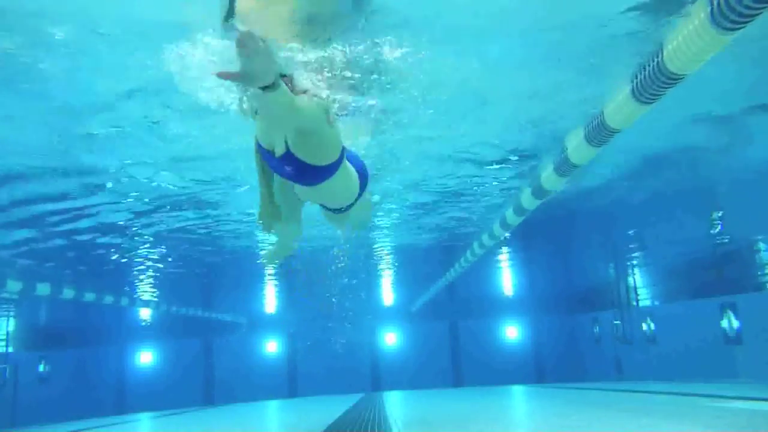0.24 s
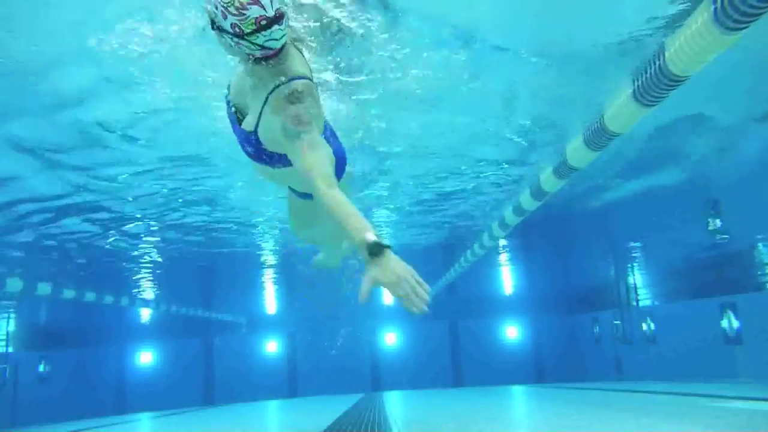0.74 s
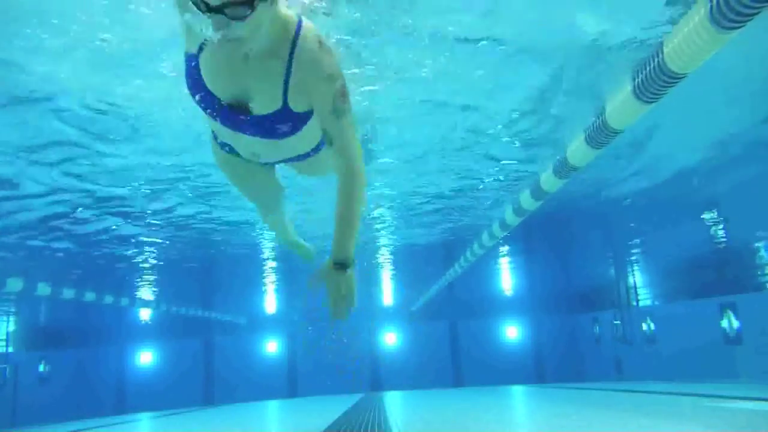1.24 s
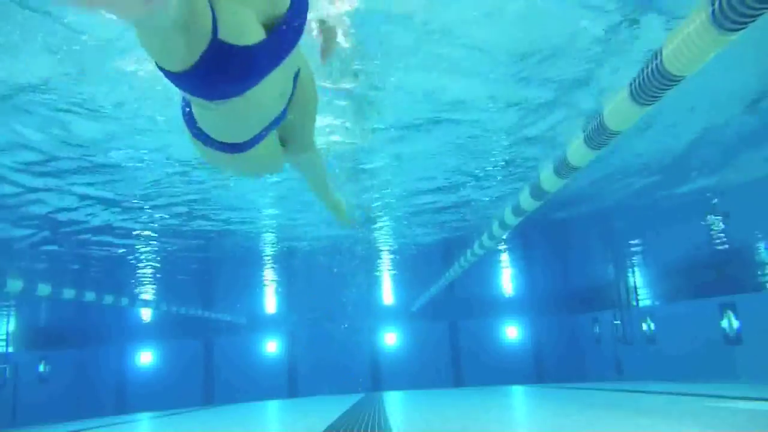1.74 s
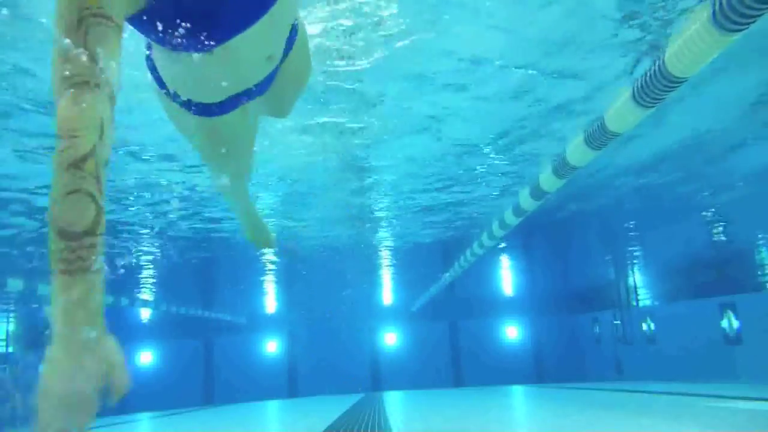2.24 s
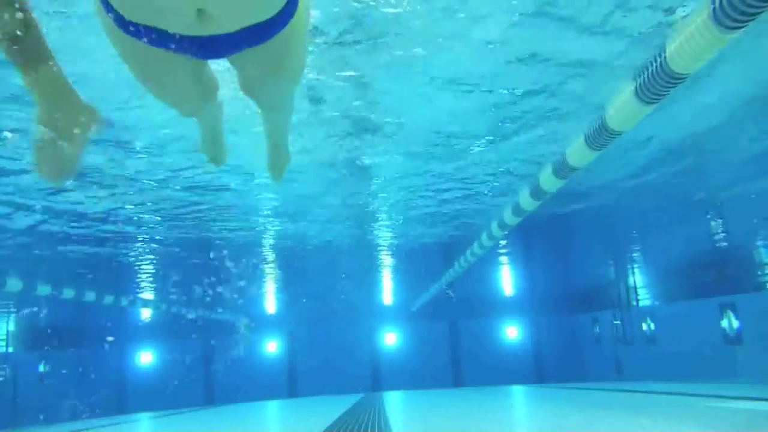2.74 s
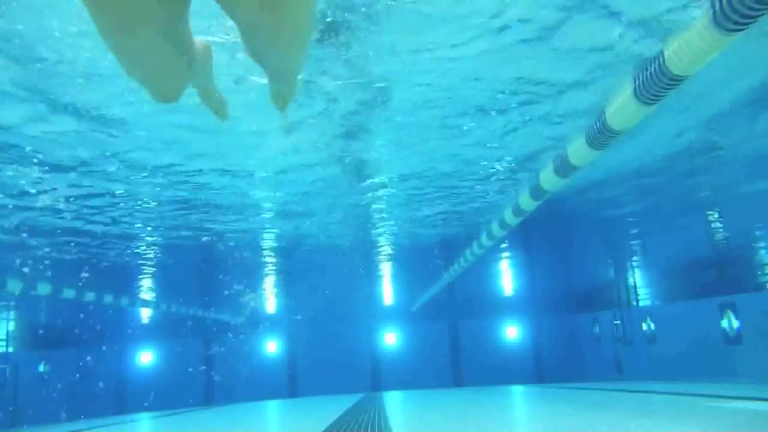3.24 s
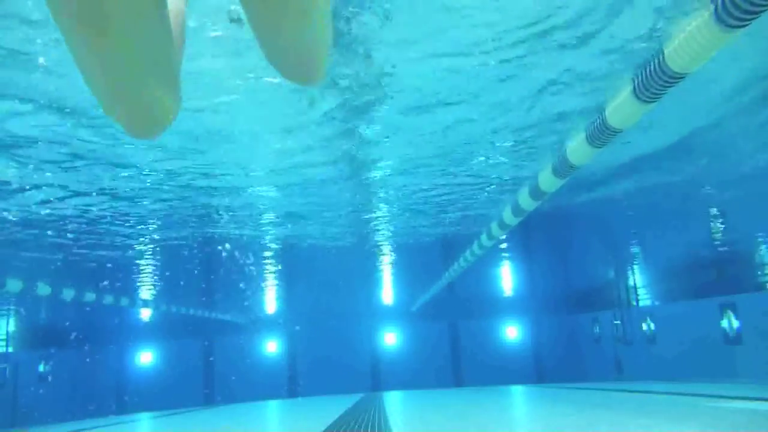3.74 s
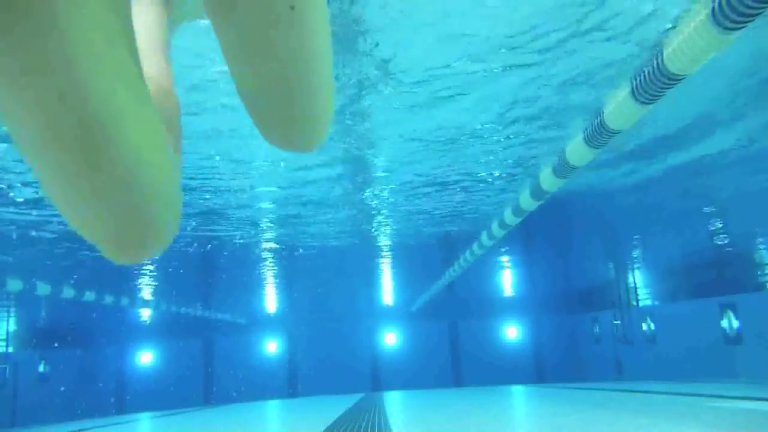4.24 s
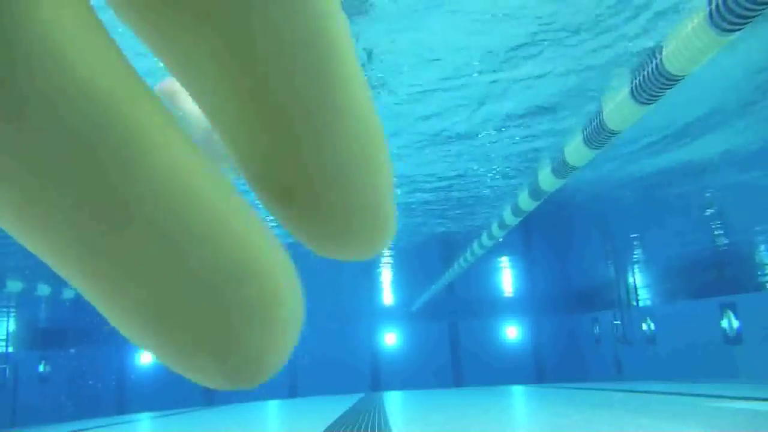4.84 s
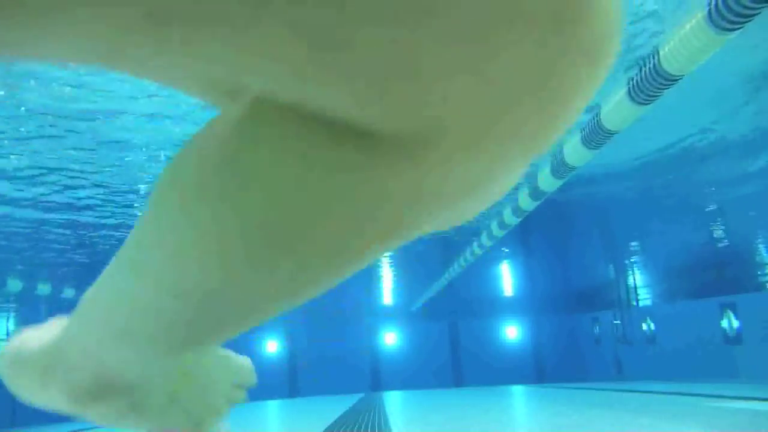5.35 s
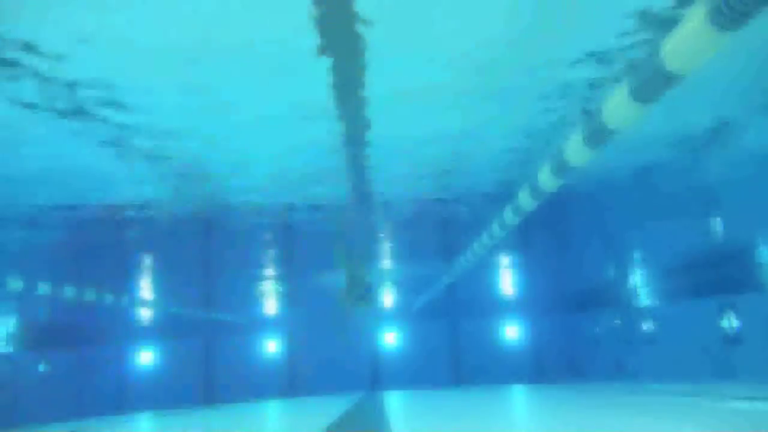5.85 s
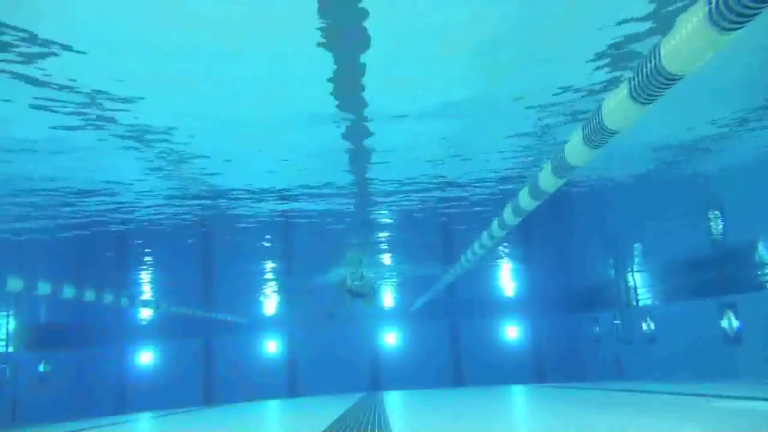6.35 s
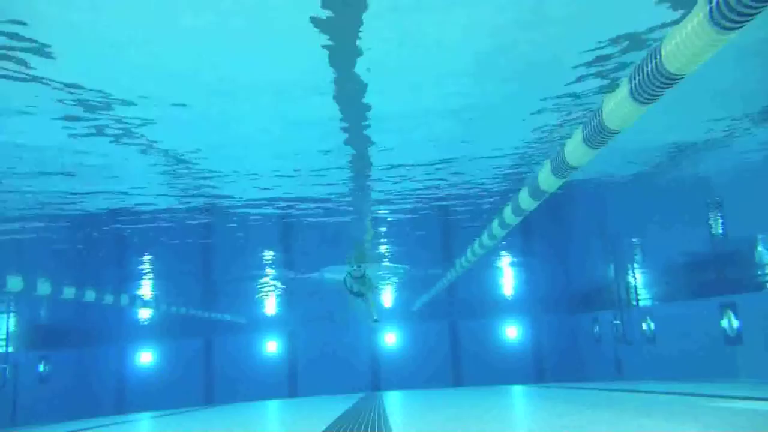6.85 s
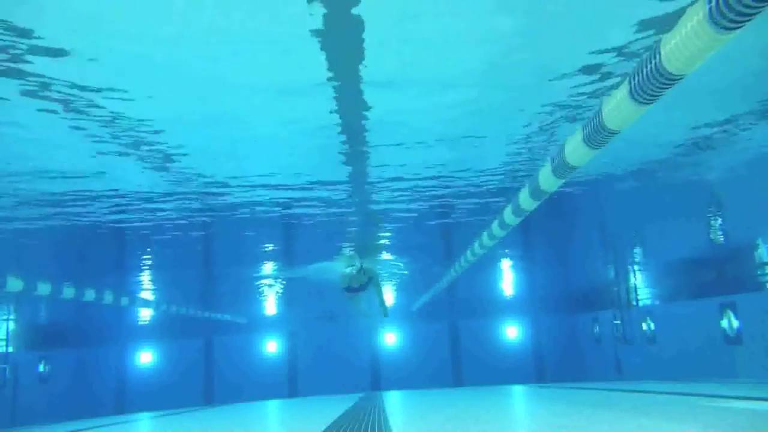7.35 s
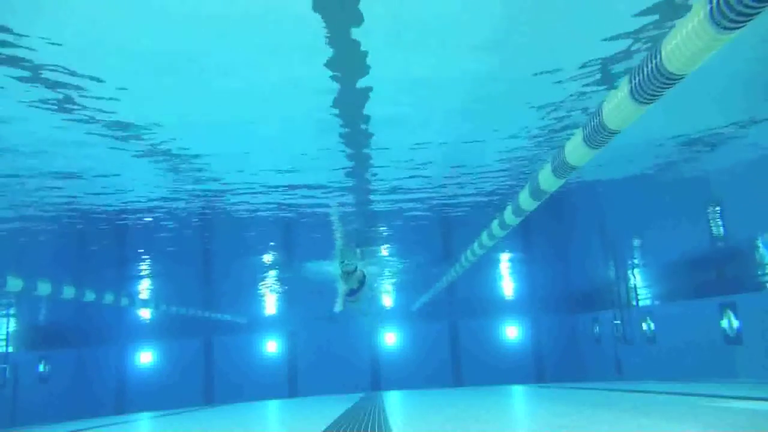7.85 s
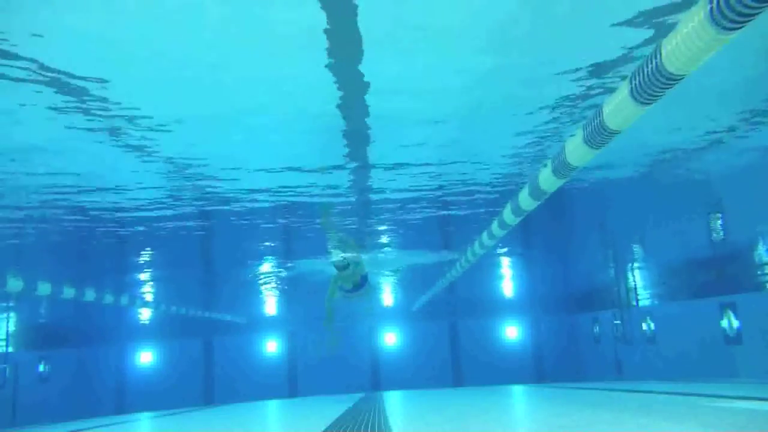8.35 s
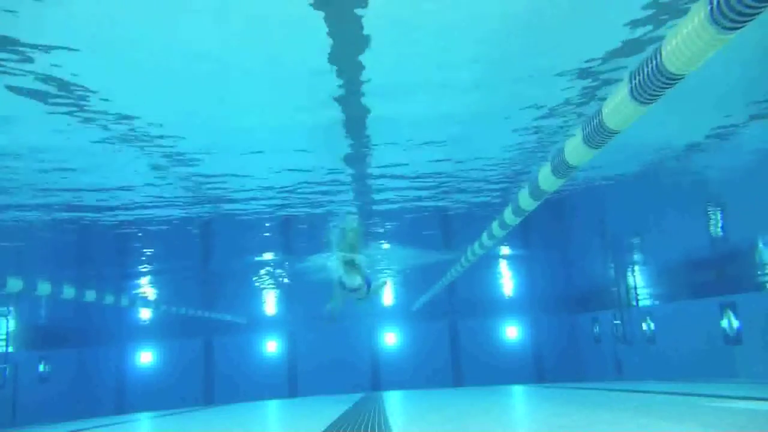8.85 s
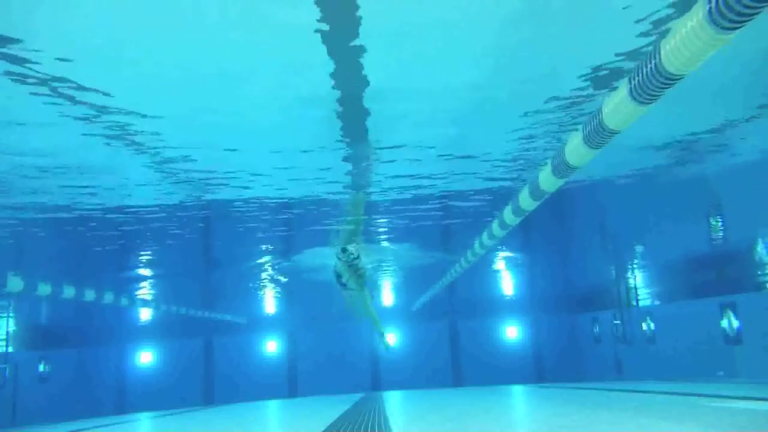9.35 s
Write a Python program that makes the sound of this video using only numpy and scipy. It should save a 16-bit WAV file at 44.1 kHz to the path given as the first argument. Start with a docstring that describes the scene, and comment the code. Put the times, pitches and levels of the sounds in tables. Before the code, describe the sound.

Continuous muffled water noise, close and boxy, flutters between low boom and a nasal ring near one kilohertz. Irregular thuds of pushed water build while a swimmer passes above, strongest from about two and a half to four and a half seconds, distorting the input. Afterwards the ringing burble dominates, with bubble gulps, faint fizz and thin ticks mostly at the right. Underwater stereo pickup inside a pool.

```python
"""Water driven by a swimmer overhead booms in an indoor pool and rings a sealed camera housing on its floor.
The water is flickering noise through resonances; near 1 kHz the housing's two microphones move against each other.
Loud surges and rings are short tones that take the noise's place and overload the input, with a crackle.
Behind them froth, gulps and pings of bubbles and a thin fizz are heard, with a few dry ticks and thin
bright clicks in the right channel, both made of very short noise bursts."""
import sys
import numpy as np
from scipy import signal
from scipy.fft import rfft, irfft, next_fast_len
from scipy.io import wavfile
from scipy.ndimage import uniform_filter1d, minimum_filter1d

SR = 44100
rng = np.random.default_rng(int(sys.argv[2]) if len(sys.argv) > 2 else 0)


def unload_wav(signal):
    """Save mono or channel-first audio to the path in sys.argv[1] as 16-bit WAV at rate SR, clipped to [-1, 1]."""
    wavfile.write(
        sys.argv[1],
        SR,
        np.round(np.clip(np.atleast_2d(signal).T, -1, 1) * 32767).astype(np.int16),
    )


def convert_level_to_amplitude(level_db):
    """Map a level in decibels to its linear amplitude factor."""
    exponent = np.asarray(level_db, float) / 20
    return 10 ** exponent


N = 423801
TIME = np.arange(N) / SR
BINS = next_fast_len(N + 8192)  # transform length, with room for the resonances to die away

# Resonances of the pool basin, the churned water, the froth, the housing and the fizz:
# centre_hz, width_hz, left_db, right_db, right_lead_rad
BASIN_MODES = [(92, 38, -33.5, -25, .2), (156.4, 67.6, 3.5, 0.5, 0.99), (276.8, 86, 0.5, 2, 0.74),
               (341.2, 60.7, 3, 0.5, 0.88)]
CHURN_MODES = [(60, 68, -41.5, -48.5, .2), (126, 89, -12, -11.5, 0.18), (191, 94, -2.5, -9.5, 0.82),
               (254, 11, -10, -9, 3.33)]
FROTH_MODES = [(389.7, 62, 5.5, -9.5, 0.34), (512.5, 66, -1, 3, 2.62), (566, 27, -1, 5.5, 2.7),
               (719.4, 92, -2.5, 6, 3.28)]
HOUSING_MODES = [(902, 370, -23, -11.5, 3.1), (1050, 312, -6.5, 0.5, 3.76), (1170, 100, -2, 1, 3.71),
                 (1296, 297, -2.5, -1, 3.72), (1510, 160, -4.5, -1, 3.47), (1611, 316, -4, -5.5, 3.59),
                 (1840, 554, -21, -29, 4.2), (2050, 370, -34.5, -29.5, 3.95), (2577, 490, -33.5, -31, 3.87),
                 (3154, 1300, -43, -47.5, 3.65)]
FIZZ_MODES = [(4450, 910, -7, 7, 0.0042), (5450, 420, -2, -8.5, 0.01), (6320, 790, -0.5, -0.5, 0.01),
              (8050, 2600, -1.5, -3, 0.0054), (10300, 3800, -2.5, -2.5, 0.0015),
              (13200, 1900, -12.5, -17, 0.0066)]
# Level of the basin boom, before it wavers: time_s, level_db (rms)
BOOM_LEVEL = [(0, -18.5), (.7, -19), (1.05, -17.5), (1.5, -15.5), (1.95, -21.5), (2.5, -13.5), (2.78, -11),
              (3.0, -18.5), (3.25, -10.5), (3.55, -10), (4.0, -23.5), (4.3, -17.5), (5.25, -18),
              (5.75, -26), (6.0, -18.5), (6.5, -20), (7.25, -16.5), (7.5, -20), (9.61, -18)]
# Levels of the stirred water, before they waver: time_s, churn_db (rms), froth_db (rms)
STIR_LEVEL = [(0, -23, -47.5), (.5, -22.5, -40), (1.201, -24, -33), (2.0, -23.5, -39), (2.25, -16, -35),
              (2.55, -24, -34.5), (3.0, -19.5, -39), (3.25, -16.5, -43), (3.548, -27, -31),
              (4.0, -22.5, -48), (4.3, -22.5, -37), (5.3, -21.5, -40), (5.75, -29, -47),
              (6.0, -36.5, -45.5), (6.6, -27.5, -40.5), (7.1, -31.5, -51.5), (7.7, -26, -41.5),
              (8.25, -31, -48.5), (8.75, -24, -45), (9.61, -34, -50)]
# Level of the housing ring, before wavering and the trim of each part: time_s, level_db (rms)
RING_LEVEL = [(0, -22), (.9, -23.5), (2.3, -22.5), (3.25, -25.5), (4.002, -27), (5.249, -23.5),
              (5.75, -25.5), (6.199, -21.5), (7.0, -21), (8.2, -22), (9.61, -21.5)]
# Level of the fizz, before it wavers: time_s, level_db (rms)
FIZZ_LEVEL = [(0, -67.5), (1.0, -68.5), (1.25, -66), (2.0, -66), (2.5, -63), (3.25, -74), (3.75, -74.5),
              (4.1, -70), (4.5, -71.5), (5.3, -69), (6.0, -70.5), (6.3, -72), (6.75, -69), (7.25, -65),
              (7.55, -68.5), (7.899, -68), (9.61, -71)]
# Loud pressure surges from strokes and kicks: peak_s, left_peak_db, pitch_hz, half_width_ms
LOUD_THUMPS = [(1.368, 4.5, 228.3, 2.3), (1.38, -7, 225.4, 4.1), (2.003, -2.5, 189, 3.4),
               (2.288, -3.5, 251, 1.4), (2.596, -2, 142, 5.2), (2.6103, 6.5, 195, 17),
               (2.675, -4, 250, 2.8), (2.743, -1, 224.3, 3), (2.72, -6.5, 301, 4.5), (2.82, -6.5, 280, 3.3),
               (2.898, -4, 203, 7.6), (2.93, -11, 293, 4), (2.754, -10, 128.6, 6.3), (2.783, -1, 191, 2.8),
               (2.854, 0, 253, 1.8), (2.861, -2.5, 304, 4.3), (2.976, 1.5, 186, 3.3),
               (3.098, 7.5, 232, 1.5), (3.121, -4, 254, 3.2), (3.109, -5, 131.7, 5.7),
               (3.175, -5, 140, 8.3), (3.189, 3, 211, 2.6), (3.203, -0.5, 313, 6), (3.212, -1.5, 232, 2.3),
               (3.223, -2.5, 224, 2), (3.249, -5.5, 270, 2.3), (3.317, -2, 192.6, 2.7),
               (3.337, 4, 253.4, 2), (3.405, -1, 325.4, 3.2), (3.421, -2, 276.6, 5.7),
               (3.434, 1.5, 207, 1.1), (3.441, 4.5, 247, 1.6), (3.469, -7, 328, 5.5),
               (3.493, -4.5, 339, 4.5), (3.522, -3, 327, 5), (3.501, 1, 223, 2.5),
               (3.508, -1.5, 201.3, 1.8), (3.533, -4, 282, 2.3), (3.59, 5.5, 308, 3.2),
               (3.617, -8.5, 130.3, 6.9), (3.706, -9.5, 120.5, 5.4), (3.751, 0, 192.3, 1.9),
               (3.796, -1.5, 178, 2.8), (4.323, 2, 331, 2.1), (4.383, -4, 314, 4), (4.415, 4.5, 328, 7),
               (4.438, -7.5, 357, 4.1)]
# Loud swells of the housing ring: peak_s, right_peak_db, pitch_hz, half_width_ms
LOUD_RINGS = [(0.266, -1, 1050, 1.8), (0.274, 2.7, 1042, 1.8), (0.333, 0.5, 1170, 2.1),
              (.369, 0, 1038, 3.1), (0.432, 2, 1208, 0.53), (0.629, -1, 1050, 3.3), (0.641, 2.5, 1036, 3.2),
              (0.82, 0.6, 1198, 1.8), (0.896, -4.5, 1440, 1.8), (1.186, 1.3, 1080, 3.3),
              (1.425, 1, 1180, 1.6), (1.448, -0.5, 1136, 3.4), (1.464, 1, 1123, 2.2),
              (1.713, 0, 1237, 0.79), (1.794, -6, 1544, 0.95), (1.958, 0, 1090, 2.2),
              (2.067, -3.5, 1380, 2.4), (2.134, -1.5, 1134, 2.9), (2.189, -2.5, 1191, 1),
              (2.384, -.5, 1074, 1), (2.399, 1.5, 1140, 1.9), (2.487, 1.5, 1620, 1.15),
              (2.589, 0.5, 1153, 0.63), (2.607, -3, 1130, 0.98), (2.624, -6, 1225, 0.72),
              (2.744, -5, 1368, 0.91), (2.837, 1.5, 1290, 0.44), (2.97, -1.5, 1428, 1.7),
              (3.015, .3, 1150, 1.3), (3.031, 1.5, 1250, 1), (3.401, 0.3, 1135, 0.9),
              (3.493, -2, 1144, 0.9), (3.696, 1, 1093, 2.1), (3.786, 0, 1043, 2.6), (3.855, -4, 1086, 4.7),
              (4.183, -1.5, 1060, 1.2), (4.273, -0.5, 1130, 1.4), (4.317, -1, 1252, 0.48),
              (4.342, 2, 1140, 1.4), (4.442, 0.5, 1060, 3.1), (4.854, -0.5, 1400, 2.8),
              (5.226, 1.4, 1236, 1.2), (5.39, -0.5, 1090, 1.3), (5.412, 1.1, 1173, 1),
              (5.909, 3.5, 1377, 0.42), (6.092, 5.5, 1100, 1.6), (6.102, 1.5, 1195, 0.6),
              (6.171, 3, 1066, 3.9), (6.239, 0.1, 1100, 2.4), (6.324, 5, 1105, 2.7),
              (6.333, 3.1, 1274, 0.99), (6.405, 1.5, 1126, 2.1), (6.509, -0.4, 1120, 3),
              (6.527, 2, 1240, 1.3), (6.744, -1.5, 1250, 1.1), (6.835, 0.2, 1185, 2.1),
              (6.979, 1, 1197, 2.1), (7.076, 1.5, 1286, 0.86), (7.163, 0.9, 1235, 1.1),
              (7.189, 1.5, 1207, 0.83), (7.294, -1, 1170, 1.1), (7.406, 1.3, 1376, 0.85),
              (7.487, 2.5, 1204, 0.79), (7.557, 2, 1182, 1.8), (7.866, 2.5, 1072, 1.2),
              (7.998, 0.4, 1130, 1.1), (8.177, 5.5, 1184, 2.5), (8.539, 0.9, 1145, 1.8),
              (8.544, 2.5, 1186, 1.4), (8.55, 0.1, 1185, 1.1), (8.605, 0, 1320, 1.6),
              (8.644, 0.1, 1177, 0.99), (8.779, 0, 1234, 1.1), (8.915, 1.1, 1227, 1.4),
              (8.998, 1.5, 1202, 0.71), (9.026, 1.5, 1150, 1.2), (9.0303, 2.7, 1070, 2),
              (9.036, 0, 1073, 1.8), (9.098, 1, 1210, 1.5), (9.169, 4.5, 1200, 1.5), (9.261, -1, 1437, 4.4),
              (9.303, 1, 1114, 1.4), (9.313, 0.5, 1183, 1.3), (9.52, 2, 1103, 2), (9.528, -0.5, 1100, 1.1)]
# Loud gulps of large bubbles: peak_s, right_peak_db, pitch_hz, half_width_ms
LOUD_GULPS = [(.042, -16, 567, 6.6), (.075, -16, 566, 3), (.39, -9.5, 892, 7.6), (.612, -19, 792, 4.4),
              (.691, -13, 617, 1.7), (1.054, -13, 747, 5.8), (1.309, -9, 828, 12), (1.526, -11, 510, 4.4),
              (2.258, -1, 710, 1.6), (2.302, -12.5, 860, 4), (2.336, -12, 674, 2.2), (2.629, -17, 563, 1.7),
              (3.002, -7.5, 848, 7.1), (2.61, -12, 479, 8), (3.19, -16, 700, 4), (3.406, -7, 600, 5.4),
              (3.49, -12, 744, 7.5), (3.61, -15, 737, 5), (3.745, -9, 770, 2.1), (3.802, -13, 665, 1.6),
              (4.325, -6, 522, 5.3), (4.544, -11, 750, 5.5), (4.93, -3, 920, 3.7), (5.012, -11.5, 686, 2.2),
              (6.287, -18, 715, 3.1), (7.701, -16, 814, 11), (9.006, -7, 901, 4.5),
              (9.059, -15.5, 800, 9.7)]
# Single small bubbles that ping near the housing: peak_s, right_peak_db, pitch_hz, half_width_ms
BUBBLE_PINGS = [(.432, -35.5, 3240, 2), (4.555, -35, 3170, 5), (4.675, -43.5, 4280, 4),
                (5.826, -24, 3200, 0.88), (6.952, -30.5, 3340, 2), (8.494, -42, 3600, 2)]
# Lesser swells at random moments, peaks relative to the level of their water:
# over_water_db, scatter_db, pitch_hz, scatter_octaves, half_width_ms
SMALL_THUMPS = (10.9, 0.75, 220, 0.25, 3.1)
SMALL_RINGS = (17.5, 1.5, 1130, .17, 3.6)
SMALL_GULPS = (23, 1.5, 800, .08, 5)
# Dry ticks, stronger at the right: start_s, left_db, right_db
DRY_TICKS = [(5.827, -52, -28), (5.909, -43.5, -35)]
# Thin bright clicks in the right channel, many just before an overload:
# start_s, right_db (rms of the first 12 samples)
BRIGHT_CLICKS = [(0.3292, -29.5), (.431, -35), (.818, -41.5), (1.366, -25.5), (1.423, -34.5), (1.4614, -27),
                 (2.3936, -35.5), (2.589, -49), (2.7406, -37), (3.0283, -41.5), (3.583, -40),
                 (3.695, -42.5), (4.41, -28), (6.17, -41), (6.509, -44.5), (6.525, -34.5), (7.5558, -24),
                 (7.865, -34.5), (7.993, -42), (8.7772, -43), (8.910, -36.5), (9.022, -32), (9.1672, -27.5),
                 (9.2997, -39), (9.525, -41.5)]


def curve(rows):
    """Columns of a table, joined by straight lines in time."""
    s, *columns = np.transpose(rows)
    return [np.interp(TIME, s, column) for column in columns]


def walk(rate_hz):
    """Random levels held for 1 / rate_hz and slewed twice; spread near 1."""
    hold = int(SR / rate_hz)
    held = np.repeat(rng.standard_normal(N // hold + 1), hold)
    return 1.3 * uniform_filter1d(uniform_filter1d(held, hold), hold)[:N]


def response(modes, hz):
    """Left and right gain of steep resonances; the right phase follows the nearest ones."""
    centre, width, left_db, right_db, lead = np.transpose(modes)[:, :, None]
    shape = 1 / (1 + ((hz - centre ** 2 / (hz + 1)) / width) ** 2) ** 3
    turn = np.angle(np.sum(shape * convert_level_to_amplitude(right_db) ** 2 * np.exp(1j * lead), axis=0))
    left = np.sqrt(np.sum(shape * convert_level_to_amplitude(left_db) ** 2, axis=0))
    right = np.sqrt(np.sum(shape * convert_level_to_amplitude(right_db) ** 2, axis=0))
    return np.array([left, right * np.exp(1j * turn)])


def wash(modes, level_db, apart, flicker_db, crest_db):
    """Flickering noise in resonances; a share (apart) is unrelated left and right; crests level off over rms."""
    noise = rng.standard_normal((3, N)) * convert_level_to_amplitude(flicker_db * walk(25))
    drive = rfft(np.sqrt(1 - apart) * noise[0] + np.sqrt(apart) * noise[1:], BINS)
    coarse_hz = np.arange(0, SR / 2, 4.)
    bin_hz = np.arange(drive.shape[1]) * SR / BINS
    spectrum = drive * [np.interp(bin_hz, coarse_hz, g) for g in response(modes, coarse_hz)]
    sound = irfft(spectrum, BINS)[:, :N]
    quadrature = irfft(-1j * spectrum, BINS)[:, :N]
    power = (sound ** 2 + quadrature ** 2).sum(axis=0)
    gain = (1 + (power / power.mean() / convert_level_to_amplitude(crest_db) ** 2) ** 2) ** -.25
    sound = sound * uniform_filter1d(uniform_filter1d(gain, size=30), size=30)
    return sound / np.sqrt(np.mean(sound.mean(axis=0) ** 2)) * convert_level_to_amplitude(level_db)


def swells(table, modes, side, rise_share, skirt, beat_db, far_db=0):
    """Short tones under a pointed bell, set at both microphones by the resonances; also their hold on each moment, 0-1.

    The table's levels hold at microphone side (0 left, 1 right)."""
    out, taken = np.zeros((2, N)), np.zeros(N)
    for (s, peak_db, hz, half_ms), draws in zip(table, rng.standard_normal((len(table), 3))):
        sign, glide, detune = draws
        near = slice(max(int(s * SR) - 3000, 0), int(s * SR) + 5000)
        t = TIME[near] - s
        rise_ms = min(half_ms * rise_share, 4.9)  # longer swells only die away more slowly
        width_ms = np.where(t < 0, rise_ms, 2 * half_ms - rise_ms)
        bell = uniform_filter1d(2. ** -(abs(1000 * t / width_ms) ** 1.5), size=24)
        foot = 2. ** -(abs(1000 * t / np.minimum(3.8 * width_ms, 25)) ** 2)  # broad and weak
        bell = (1 - skirt) * bell + skirt * foot
        gains = response(modes, np.array([1. * hz]))
        gains[1 - side] *= convert_level_to_amplitude(far_db)
        # a crest or a trough meets the top of the bell; the pitch slides a few percent over it
        cycles = hz * t * (1 + .05 * glide * np.tanh(250 * t / half_ms))
        tone = np.exp(2j * np.pi * cycles)
        # a weaker neighbouring tone beats with it and makes the crests uneven
        offset = np.sign(detune) * (.15 + 0.11 * abs(detune))
        beat = (1 + convert_level_to_amplitude(beat_db) * np.exp(2j * np.pi * hz * t * offset)) / (1 + convert_level_to_amplitude(beat_db))
        scale = gains / gains[side] * np.sign(sign) * convert_level_to_amplitude(peak_db)
        out[:, near] += np.real(scale * bell * tone * beat)
        taken[near] = np.maximum(taken[near], np.sqrt(abs(bell) / bell.max()))
    return out, taken


def scattered(rule, level_db, count):
    """Rows of swells at random moments, as strong as the water is then."""
    over_db, scatter_db, hz, octaves, half_ms = rule
    when = rng.random(count) * (N - 1)
    size, pitch, width = rng.standard_normal((count, 3)).T
    peak_db = level_db[when.astype(int)] + over_db + scatter_db * size
    return list(zip(when / SR, peak_db, hz * 2 ** (octaves * pitch), half_ms * 1.34 ** width))


def fizz():
    """Thin treble hiss of fine bubbles: noise in broad high resonances, mostly unrelated left and right."""
    level_db, = curve(FIZZ_LEVEL)
    return wash(FIZZ_MODES, level_db + .8 * walk(16), 0.66, 1.8, 12)


def ticks():
    """Dry ticks, stronger at the right: noise bursts that die within about a millisecond."""
    out = np.zeros((2, N))
    for s, left_db, right_db in DRY_TICKS:
        burst = rng.standard_normal(60) * np.exp(-np.arange(60) / 12)
        out[:, int(s * SR):int(s * SR) + 60] = convert_level_to_amplitude(np.array([[left_db], [right_db]])) * burst
    return out


def clicks():
    """Thin bright clicks in the right channel: noise differenced twice, under a steep decay."""
    out = np.zeros((2, N))
    for s, db in BRIGHT_CLICKS:
        burst = np.diff(rng.standard_normal(62), n=2) * np.exp(-np.arange(60) / 8.)
        out[1, int(s * SR):int(s * SR) + 60] += convert_level_to_amplitude(db) * burst / np.sqrt(np.mean(burst[:12] ** 2))
    return out


def bubbles(low_hz, octaves, cycles, db, count):
    """Bubbles of scattered size ring for some cycles and glide up slightly."""
    out = np.zeros((2, N + 4000))
    for when, pitch, size, pan in rng.random((count, 4)):
        hz = low_hz * 2 ** (octaves * pitch)
        turns = np.arange(min(int(5 * cycles * SR / hz), 4000)) * hz / SR
        tone = np.sin(2 * np.pi * turns * (1 + .01 * turns / cycles))
        ring = tone * np.exp(-turns / cycles) * (1 - np.exp(-turns / 2))
        start = int(when * N)
        level = convert_level_to_amplitude(db - 4 * np.log(size + .01))  # few loud, many faint
        out[:, start:start + len(ring)] += level * ring * [[1.2 - pan], [.2 + pan]]
    return out[:, :N]


def blips(froth_db):
    """Larger bubbles swell with the froth; small ones burst throughout."""
    large = convert_level_to_amplitude(froth_db) * bubbles(500, 1.0, 4.2, -1.3, count=400)
    small = bubbles(2200, .75, 12, -54.5, count=2000)
    return large + small


def gulps(froth_db):
    """Large bubbles gulp and single small ones ping: quick-rising tones through froth and housing."""
    rows = LOUD_GULPS + BUBBLE_PINGS + scattered(SMALL_GULPS, froth_db, count=16)
    sound, _ = swells(rows, FROTH_MODES + HOUSING_MODES, side=1, rise_share=0.24, skirt=0.13, beat_db=-20.5)
    return sound


def froth(froth_db):
    """Frothy mid-band noise of the stirred water in its resonances, slowly wavering."""
    return wash(FROTH_MODES, froth_db + 2.3 * walk(2.3), 0.056, 2.0, 12.0)


def churn(churn_db):
    """Low noise of the water churned by the swimmer, wavering a few times a second."""
    return wash(CHURN_MODES, churn_db + 1.5 * walk(4), .01, 1.5, 5.0)


def basin_boom(boom_db):
    """Water noise booming in the low resonances of the basin, nearly alike at both microphones but for phase."""
    return wash(BASIN_MODES, boom_db + .8 * walk(4), .004, 1.5, 7.0)


def housing_ring(ring_db):
    """Water noise rings the housing: its lowest three resonances and the higher ones waver partly together."""
    lumps_db = ring_db + 1.3 * walk(16)
    lower = wash(HOUSING_MODES[:3], lumps_db - 2.5 + 0.81 * walk(14), 0.011, 0.57, 13)
    upper = wash(HOUSING_MODES[3:], lumps_db - 4.5 + 1.2 * walk(14), 0.018, 1.2, 7.8)
    return lower + upper


def thump_swells(rows):
    """Pressure surges: low tones in the basin and churn resonances, rising almost as slowly as they fall."""
    return swells(rows, BASIN_MODES + CHURN_MODES, side=0, rise_share=.9, skirt=0.11, beat_db=-16)


def ring_swells(rows):
    """Swells of the housing ring: they rise faster than they fall, with the left trimmed slightly."""
    return swells(rows, HOUSING_MODES, side=1, rise_share=0.44, skirt=0.13, beat_db=-12.5, far_db=-1.5)


def merge(low, ring, thump_rows, ring_rows, thin):
    """A swell is the resonance running in step, so it takes the noise's place; the other band thins under it."""
    thumps, thumping = thump_swells(thump_rows)
    rings, ringing = ring_swells(ring_rows)
    low = low * (1 - .9 * thumping ** 2) * (1 - thin * ringing)
    ring = ring * (1 - 0.7 * ringing) * (1 - 0.31 * thin * thumping ** 2)
    return low, ring, thumps, rings


def level_off(x, top_db):
    """Gain that lets the crests of the steady water flatten out gently under a ceiling."""
    crest = -minimum_filter1d(-abs(x).max(axis=0), size=90)
    gain = (1 + (crest / convert_level_to_amplitude(top_db)) ** 6) ** (-1 / 6)
    return uniform_filter1d(uniform_filter1d(gain, size=45), size=45)


def scene():
    """Boom, churn, froth, ring and bubbles under a soft ceiling, then loud swells, fizz, ticks and clicks."""
    (boom_db,), (churn_db, froth_db), (ring_db,) = map(curve, (BOOM_LEVEL, STIR_LEVEL, RING_LEVEL))
    low = basin_boom(boom_db) + churn(churn_db)
    ring = housing_ring(ring_db)
    small_thumps = scattered(SMALL_THUMPS, boom_db, count=30)
    small_rings = scattered(SMALL_RINGS, ring_db, count=120)
    low, ring, thumps, rings = merge(low, ring, small_thumps, small_rings, thin=0.18)
    low = low + thumps
    ring = ring + rings + gulps(froth_db) + froth(froth_db) + blips(froth_db)
    gain = level_off(low + ring, top_db=-2.2)
    water = sum(merge(low * gain, ring * gain, LOUD_THUMPS, LOUD_RINGS, thin=.88))
    return water + fizz() + ticks() + clicks()


def top_cut(x):
    """Nothing passes above the cut-off."""
    return signal.sosfilt(signal.butter(12, 15850, fs=SR, output="sos"), x)


def record(dry):
    """The microphones lose the deep bass; the input clips flat just under full scale, with a bright edge."""
    x = signal.sosfilt(signal.butter(2, 65., "high", fs=SR, output="sos"), dry)
    x = np.clip(x, -.985, .985)
    edge_band = signal.butter(1, [15300., 16300.], "band", fs=SR, output="sos")
    x = x + 1.8 * signal.sosfilt(edge_band, x)
    return top_cut(x)


dry = scene()
out = record(dry)
unload_wav(out)
```